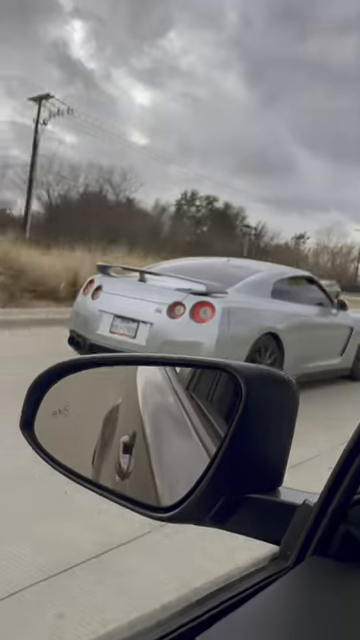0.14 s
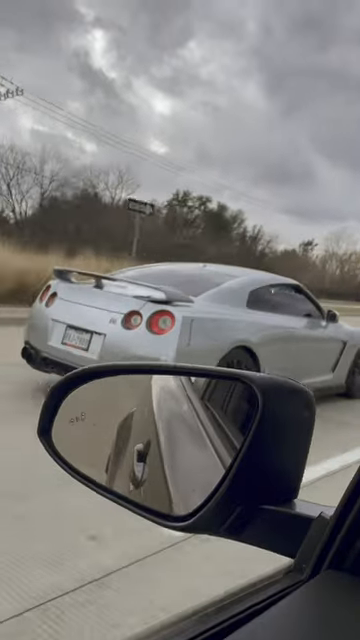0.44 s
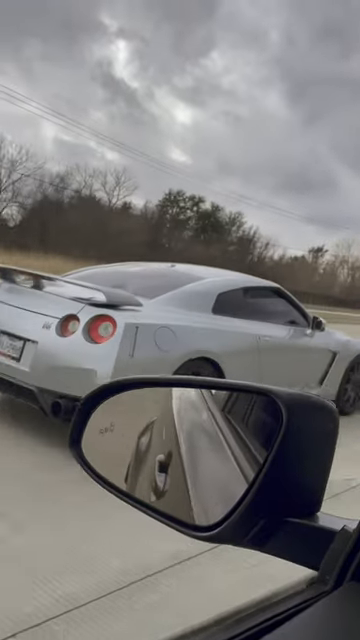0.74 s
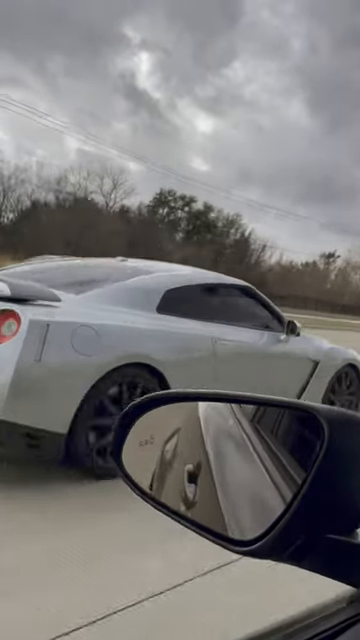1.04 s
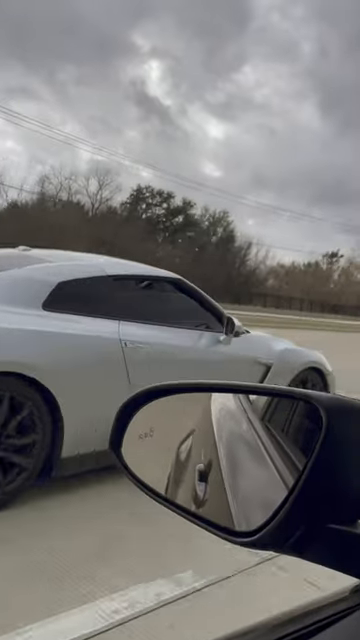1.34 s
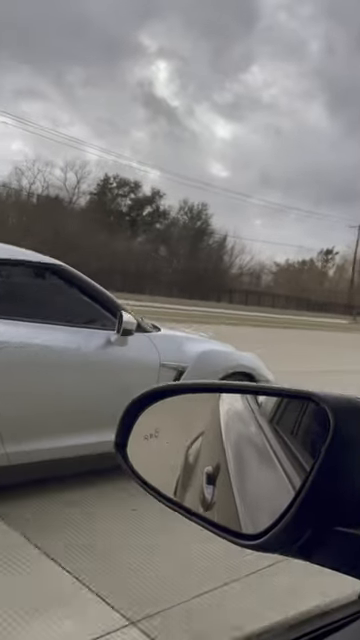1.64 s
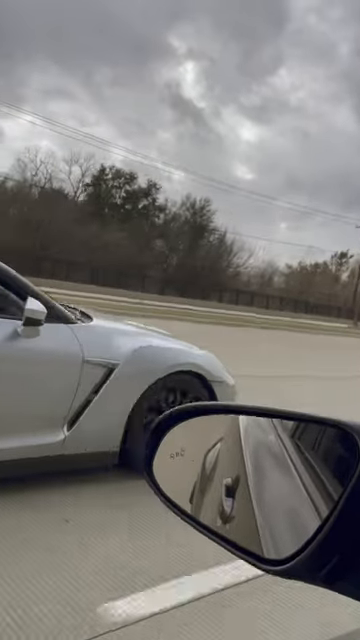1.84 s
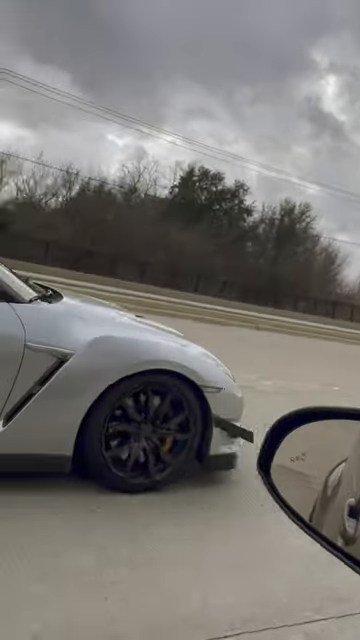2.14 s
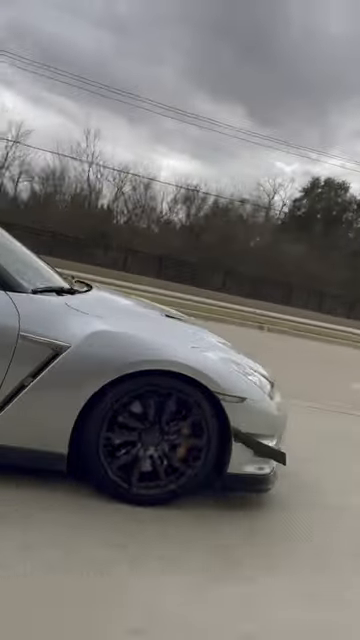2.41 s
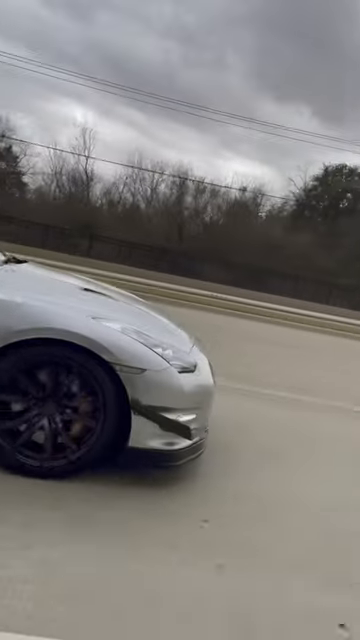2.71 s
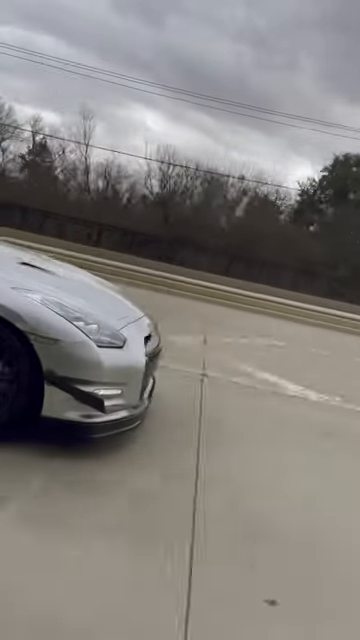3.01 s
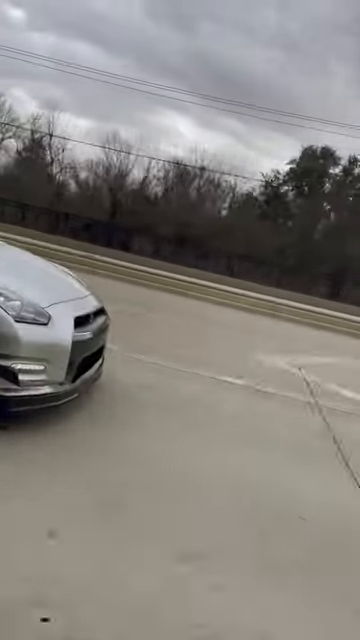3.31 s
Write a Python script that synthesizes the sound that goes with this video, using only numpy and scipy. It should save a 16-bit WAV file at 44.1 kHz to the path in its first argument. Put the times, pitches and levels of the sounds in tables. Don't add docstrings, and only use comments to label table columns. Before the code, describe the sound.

A six-cylinder sports car drones with a bright, metallic exhaust rasp for the first second, slowly dropping in pitch. A pop cracks near 1.2 s and the rasp dulls. Around 1.6-1.85 s, rapid crackles and thuds accompany a deep throttle surge. A lower hum continues, rising slightly after 2.6 s, with a hard bang at 2.9 and pops near 3.15 and 3.4. Wind gusts buffet the microphone over tyre roar.

```python
import sys
import numpy as np
from scipy import signal
from scipy.io import wavfile

SR = 44100
rng = np.random.default_rng(int(sys.argv[2]) if len(sys.argv) > 2 else 0)


def waveform_to_disk(signal):
    frames = np.transpose(np.atleast_2d(signal))
    scaled = np.clip(frames, -1, 1) * 32767
    samples = np.round(scaled).astype(np.int16)
    wavfile.write(sys.argv[1], SR, samples)


def nominal_scale(level):
    x = np.asarray(level, float) / 20
    return 10 ** x


N = 152586

# [f/Hz, left minus right level/dB]
LEAN = [(60, -7), (150, -2), (380, -1), (960, -3.5), (2410, -4.5), (6060, 2)]


def rms_one(x):
    return x / np.sqrt(np.mean(x ** 2) + 1e-20)


def in_time(rows):
    s, *columns = np.transpose(rows)
    return [np.interp(np.arange(N) / SR, s, column) for column in columns]


def at_hz(points, hz):
    f_hz, value = np.transpose(points)
    return np.interp(np.log(hz), np.log(f_hz), value)


def drift(rate_hz):
    r = np.exp(-80 * np.pi * rate_hz / SR)
    slow = signal.lfilter([1], [1, -2 * r, r * r], rng.standard_normal(N // 40 + 2002))[2000:]
    return np.interp(np.arange(N) / 40, np.arange(len(slow)), rms_one(slow))


def resonance(x, hz, width_hz):
    r = np.exp(-np.pi * width_hz / SR)
    b = [(1 - r * r) / 2, 0, (r * r - 1) / 2]
    a = [1, -2 * r * np.cos(2 * np.pi * hz / SR), r * r]
    return signal.lfilter(b, a, x + 1e-18)


def aside(facing):
    fade = 1.1
    return np.clip(1 - fade * facing, -.3, 1) * np.array([[.5], [-.5]])


def banded_noise(spectrum, patchy_db, rate_hz):
    # [f/Hz, correlation/1]
    likeness = [(40, 1), (200, 0.98), (700, 0.63), (2000, 0.94), (5000, 0.077), (12000, 0.15)]
    out, together = 0, drift(rate_hz)
    low_hz, high_hz = spectrum[0][0], spectrum[-1][0]
    edges = low_hz * 2 ** np.arange(0, np.log2(high_hz / low_hz) + .3, .4)
    white = rng.standard_normal((2, 2, N))
    for k, (low, high) in enumerate(zip(edges, edges[1:])):
        band = signal.butter(2, [low, min(high, .45 * SR)], "band", fs=SR, output="sos")
        mid, side = signal.sosfilt(band, white[k % 2])
        hz = np.sqrt(low * high)
        alike = np.clip(at_hz(likeness, hz), -1, 1)
        flicker_db = patchy_db * (1.1 * together + 0.33 * drift(rate_hz))
        stereo = np.sqrt(1 + alike) * mid + np.sqrt(1 - alike) * side * [[1], [-1]]
        out = out + nominal_scale(at_hz(spectrum, hz) + flicker_db) * stereo
    return rms_one(out)


def treble_hiss():
    # [low f/Hz, high f/Hz, level/dB]
    treble_bands = [(8830, 13100, -0.7), (15200, 15800, -20)]
    level_db, rise_db_per_s, alike = -78, 1, .3
    hiss = 0
    for low_hz, high_hz, db in treble_bands:
        band = signal.butter(8, [low_hz, high_hz], "band", fs=SR, output="sos")
        hiss = hiss + nominal_scale(db) * rms_one(signal.sosfilt(band, rng.standard_normal((2, N))))
    mid, side = hiss
    gain = nominal_scale(level_db + rise_db_per_s * np.arange(N) / SR + .7 * drift(12))
    return gain * (mid + np.sqrt(1 - alike) * side * [[1], [-1]])


def wind():
    # [t/s, level/dB]
    gusts = [(0.0, -29.5), (0.67, -36), (0.99, -26.5), (1.0, -20.5), (1.36, -23.5), (1.42, -44),
             (1.49, -19.5), (1.53, -35), (1.81, -16), (1.95, -26), (2.0, -18.5), (2.06, -33), (2.23, -38),
             (2.26, -23.5), (2.83, -34.5), (2.9, -15.5), (3.41, -19.5), (3.46, -19.5)]
    # [f/Hz, density/dB per Hz]
    wind_spectrum = [(22, -27.5), (38, -9.5), (56, -1.5), (85, -8), (125, -21.5), (170, -19.5)]
    gust_db, = in_time(gusts)
    return nominal_scale(gust_db - 1.5) * banded_noise(wind_spectrum, patchy_db=1.2, rate_hz=9)


def road():
    # [t/s, level/dB]
    speed = [(0, -31), (1.5, -39), (1.8, -38.5), (2.6, -35), (3.46, -30.5)]
    # [f/Hz, density/dB per Hz]
    road_spectrum = [(130, -20), (250, -10.5), (500, -10), (970, -19), (2000, -28.5), (4000, -37.5),
                     (6000, -38), (6900, -44.5)]
    speed_db, = in_time(speed)
    return nominal_scale(speed_db) * banded_noise(road_spectrum, patchy_db=1.0, rate_hz=14)


def pops():
    # [t/s, peak/dB, thud over crack/dB, crack cut f/Hz]
    pop_table = [(1.009, -23, 9, 1782), (1.164, -10.5, 4.5, 5400), (1.594, -24.5, 6, 1195),
                 (1.672, -25.5, 20, 1490), (1.695, -33, 5, 1474), (1.705, -26, 8, 1300),
                 (1.725, -24, 15, 2300), (1.738, -25.5, 19.5, 1200), (1.755, -24, 18, 2100),
                 (1.805, -12, 14, 2200), (1.821, -17, -3.5, 3400), (1.828, -16.5, 13.5, 2790),
                 (1.84, -22, -5, 1500), (2.9032, -5.5, 6.5, 4990), (2.924, -23.5, 1, 2000),
                 (3.142, -12.5, -11.5, 2890), (3.148, -19.5, 10.5, 2000), (3.177, -19.5, 20, 2056),
                 (3.185, -14, 17, 2000), (3.417, -12.5, 9.5, 2080)]
    thud_hz, thud_t60_s, thud_lag_s = 149.4, 0.034, 0.0006
    crack_cycles, crack_body_hz, crack_dull_hz = 7, 1000, 1500
    out, t = np.zeros(N + SR), np.arange(4000) / SR
    noise = rng.standard_normal((len(pop_table), len(t)))
    body = signal.butter(1, [300, crack_body_hz], "band", fs=SR, output="sos")
    dull = signal.butter(1, crack_dull_hz, fs=SR, output="sos")
    u = np.maximum(t - thud_lag_s, 0)
    thud_env = np.minimum(u * thud_hz * 2, 1) * nominal_scale(-60 * u / thud_t60_s)
    for (s, db, thud_db, cut_hz), n in zip(pop_table, noise):
        burst = n * np.minimum(t / .0004, 1) * np.exp(-t * cut_hz / crack_cycles)
        burst = burst + 2.2 * (cut_hz / 5000) ** 2 * (np.abs(t - .0012) < .00006)
        cut = signal.butter(5, cut_hz, fs=SR, output="sos")
        crack = signal.sosfilt(np.vstack([body, dull, cut]), burst)
        detune = nominal_scale(np.clip(n[0], -2, 2))
        tone = np.sin(2 * np.pi * thud_hz * u * detune) + 0.84 * np.sin(2 * np.pi * 2.1 * thud_hz * u)
        i = int(s * SR)
        out[i:i + len(t)] += nominal_scale(db) * (crack / np.abs(crack).max() + nominal_scale(thud_db) * thud_env * tone)
    return out[:N] * nominal_scale([[-.6], [.6]])


def roar(turns, level_db, facing):
    roar_db, roar_hz, width_hz, pulse = -26.5, 1360, 790, 0.65
    noise = rng.standard_normal((2, N))
    stereo = noise[0] + 0.44 * noise[1] * [[1], [-1]]
    stream = resonance(resonance(stereo, roar_hz, width_hz), roar_hz, 2 * width_hz)
    gain = nominal_scale(level_db + roar_db) * np.clip(1.5 * facing - .25, 0, 1)
    return gain * (1 + pulse * np.cos(12 * np.pi * turns)) * rms_one(stream)


def rasp(turns, level_db, facing):
    cylinder_db = [0, -3.5, -4, -3.5, -11, -9]
    cylinder_late = [0, .008, .004, 0, .006, -.006]
    # [f/Hz, width/Hz, level/dB, change as the pipe swings past/dB per s]
    pipe_modes = [(1030, 120, -4.5, 9), (1307, 63, -4.5, 15.5), (1544, 210, 1.5, 3), (1933, 160, 8, -3),
                  (2200, 170, 6.5, -15), (2477, 91, 2.5, -24.5), (3110, 380, -15.5, 1),
                  (3520, 150, -16.5, 12), (3700, 860, -15.5, -7.5), (5080, 450, -23.5, 1),
                  (5170, 530, -23, -17)]
    # [t/s, level/dB]
    flare = [(0, 5.5), (.06, -8.5), (.11, 10), (.19, 4), (.24, -10), (.3, 7.5), (.4, 6.5), (.47, 0.5),
             (.57, 8.5), (.9, 5), (1.0, -16.5), (1.2, -18)]
    rasp_db, loss_db, loss_db_per_octave = -16.5, 10, 35
    scatter_db, puff_db, puff_s = 1.0, -11.5, .0025
    ground_gain, ground_lag_s, ground_lag_growth = 0.099, 0.000861, 0.00071
    flare_from_hz, sway_db, sway_hz = 2800, 1.5, 4

    k = np.arange(int(turns[-1] * 6))
    at = np.interp(k + np.take(cylinder_late, k % 6), turns * 6, np.arange(N), left=0)
    size = nominal_scale(np.take(cylinder_db, k % 6) + scatter_db * rng.standard_normal(len(k)))
    i = at.astype(int)
    clicks = np.zeros(N)
    clicks[i] = size * (1 - at + i)
    clicks[i + 1] = size * (at - i)
    clicks[:2] = 0

    puffs = signal.lfilter([1], [1, -np.exp(-1 / (puff_s * SR))], clicks) * rng.standard_normal(N)
    puffs = rms_one(np.diff(puffs, n=2, prepend=[0, 0]))
    seconds = np.arange(N) / SR
    echo_at = seconds - ground_lag_s - ground_lag_growth * seconds
    clicks = clicks + ground_gain * np.interp(echo_at, seconds, clicks)
    kick = rms_one(clicks) + nominal_scale(puff_db) * puffs * 8

    side = aside(facing)
    flare_db, = in_time(flare)
    pipe = 0
    for m, (hz, width_hz, db, turn_db_per_s) in enumerate(pipe_modes):
        mode_db = db + flare_db * (hz > flare_from_hz) + turn_db_per_s * np.minimum(seconds, 1.2)
        mode_db = mode_db + sway_db * drift(sway_hz) + side * at_hz(LEAN, hz)
        mode_db = mode_db - loss_db_per_octave * min(np.log2(hz / 930), 1.5) * facing
        ring = resonance(resonance(kick, hz, width_hz), hz, 2 * width_hz)
        pipe = pipe + (-1) ** m * nominal_scale(mode_db) * ring
    return nominal_scale(level_db + rasp_db - loss_db * np.minimum(facing, 1)) * rms_one(pipe)


def drone(turns, cycle_hz, level_db, boost_db, beat_db, facing):
    tail = [-23, -22, -29.5, -31, -34.5, -22.5, -44.5, -32.5, -25.5, -23.5, -22, 2.13, -6.5, -15, -23,
            -43.5, -38.5, -2, -15.5, -19.5, -42.5, -42, -35, -9, -21, -26.5, -39.5, -52.5, -39, -12.5,
            -20.5, -27.5, -39, -33.5, -40.5, -45]
    quarter = [-34, -25, -20, -34.5, -43.5, -11.5, -13, -27, -12, -23, -10, -1.5, -1.5, -6, -14.5, -29.5,
               -19.5, -11, -26.5, -19.5, -15, -35, -35.5, -31, -18, -31, -26, -32.5, -37.5, -28, -11.5,
               -17.5, -19, -27.5, -24.5, -40]
    flank = [-45.5, -39.5, -25.5, -32, -37.5, -11, -29.5, -24, -9.5, -28, -14, 1.7, -7.5, -24.5, -17.5, -24,
             -17, -31, -9.5, -19, -27.5, -53, -26.5, -32, -22, -32, -45, -42, -37, -34, -35, -44, -39.5,
             -46.5, -47.5, -41]
    nose = [-17, -26, -17.5, -24.5, -14, -9, -21.5, -10.5, 14.5, -16.5, -26.5, 3.4, -2, -10, 0.5, -17, -5,
            13, -20, -23.5, -8.5, -35, -35, -22.5, -11.5, -24, -21, -24, -30.5, -17, -3.5, -20.5, -25.5,
            -32, -28.5, -5]
    # [f/Hz, left lead/rad]
    lead = [(60, -0.32), (260, -0.42), (780, -0.56), (1200, -3.7), (2700, 1.2), (3300, .01)]
    low_orders = 8
    surge_db = -18.5
    wobble_db, wobble_rad = 1.5, 0.16
    pipe_lag_turns = 0.39
    skew_turns = 0.16
    out, side, free = 0, aside(facing), rng.random(len(tail))
    for k, heard_db in enumerate(zip(tail, quarter, flank, nose), 1):
        db = level_db if k == 12 else np.minimum(level_db, surge_db)
        db = db + np.interp(facing, [0, .5, 1, 2], heard_db) + boost_db * (k < low_orders)
        if k == 13:
            db = beat_db
        hz = k * cycle_hz.mean()
        lag = pipe_lag_turns * k if k % 6 == 0 or k == 13 else free[k - 1]
        phase = 2 * np.pi * (k * turns - lag - skew_turns * (k in (18, 30))) + wobble_rad * drift(12.0)
        gain = np.sqrt(2) * nominal_scale(db + wobble_db * drift(4.7) + side * at_hz(LEAN, hz))
        out = out + gain * np.cos(phase + side * at_hz(lead, hz))
    return out


def scene():
    # [t/s, four-stroke cycle f/Hz, twelfth order level/dB, low-order throttle boost/dB,
    # thirteenth order (beat between the banks) level/dB]
    engine = [(0, 32.74, -21.5, 6.3, -38), (0.05, 32.12, -23.5, 9, -43.5), (0.1, 31.66, -21, 3.3, -39),
              (0.15, 31.42, -19, 4.9, -40.5), (0.22, 31.9, -21.5, 4.9, -28.5), (0.3, 31.22, -19.5, 1, -35),
              (0.4, 31.35, -20, 1, -25), (0.5, 31.07, -21, 3, -24.5), (0.6, 30.86, -19.5, 2.7, -28.5),
              (0.7, 30.59, -20.5, 1.9, -24), (0.8, 30.51, -19.5, 4.7, -25), (0.9, 30.2, -22.5, 3, -26.5),
              (1, 29.77, -23.5, 3, -23.5), (1.1, 29.47, -24, 4.8, -26.5), (1.2, 29.47, -22.5, 5.5, -26.5),
              (1.3, 28.8, -27.5, 3.5, -30), (1.4, 28.93, -26.5, 2.7, -31.5),
              (1.5, 28.68, -29.5, 4.1, -26.5), (1.6, 28.38, -28, 2.4, -30), (1.67, 27.7, -28, 2.1, -46.5),
              (1.73, 28.54, -22, 8.1, -43.5), (1.8, 28.15, -15, 6, -38), (1.86, 28.06, -14, 9, -30),
              (1.93, 28.77, -18, 3, -39.5), (2, 28.54, -22, 6.9, -30.5), (2.1, 27.65, -21.5, 5.9, -29),
              (2.2, 28.56, -22, 6.3, -32), (2.3, 28.24, -23, 1, -25), (2.45, 28.5, -22.5, 3, -27),
              (2.6, 28.55, -25, 1, -27), (2.75, 29.1, -26.5, 4.4, -26.5), (2.87, 29.13, -27.5, 3, -26.5),
              (2.95, 29.74, -27.5, 3.7, -30), (3.05, 29.77, -31, 6.4, -40), (3.15, 29.92, -31, 1.1, -28.5),
              (3.25, 30.12, -31, 3, -44), (3.35, 30.82, -32, 7.4, -39), (3.459, 31.47, -25.5, 4.1, -46)]
    # [t/s, 0 tail 1 flank 2 nose]
    facing_table = [(0, .01), (.92, 0.015), (1.03, 0.15), (1.22, 0.16), (1.33, .48), (1.65, 0.55),
                    (1.8, 0.98), (2.05, 1.0), (2.5, 1.14), (2.85, 1.515), (3.1, 1.68), (3.46, 1.637)]
    cycle_hz, level_db, boost_db, beat_db = in_time(engine)
    facing = np.clip(in_time(facing_table)[0], 0, 2)
    turns = 1 + np.cumsum(cycle_hz) / SR
    background = treble_hiss() + wind() + road()
    exhaust = pops() + roar(turns, level_db, facing) + rasp(turns, level_db, facing)
    return background + exhaust + drone(turns, cycle_hz, level_db, boost_db, beat_db, facing)


def low_pass(x):
    return signal.sosfilt(signal.butter(12, 15790, fs=SR, output="sos"), x)


def record(dry):
    rounded = .95 * np.tanh(dry / .95)
    notch = signal.cheby2(10, 50, [6900, 8400], "bandstop", fs=SR, output="sos")
    return low_pass(signal.sosfilt(notch, rounded))


dry = scene()
out = record(dry)
waveform_to_disk(out)
```